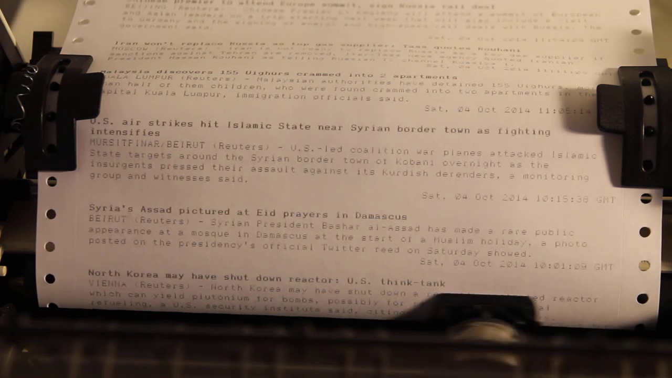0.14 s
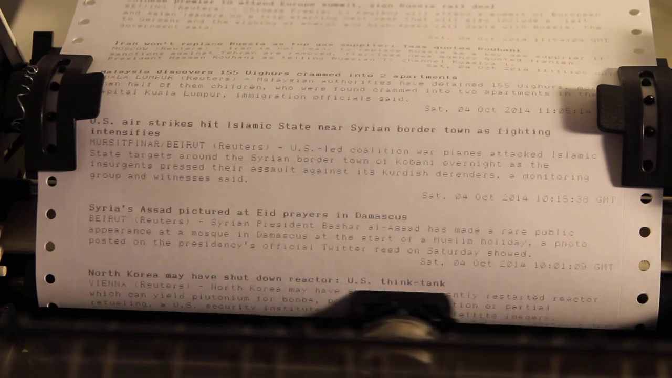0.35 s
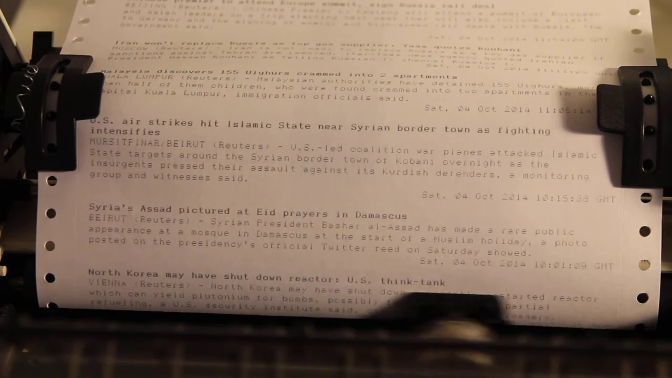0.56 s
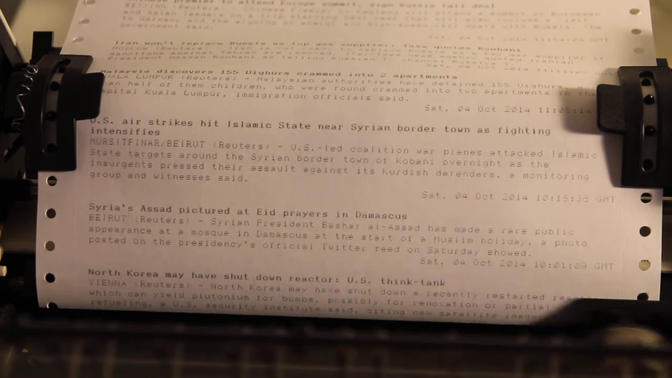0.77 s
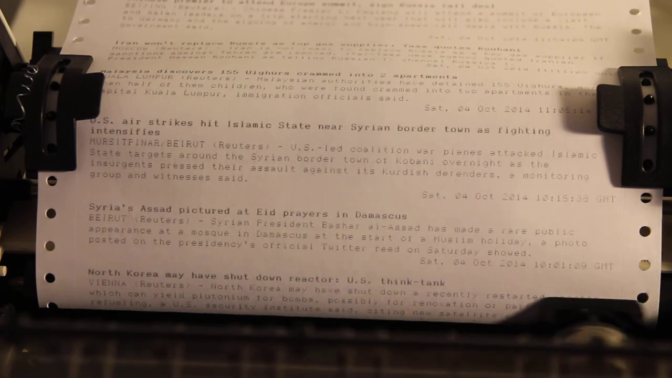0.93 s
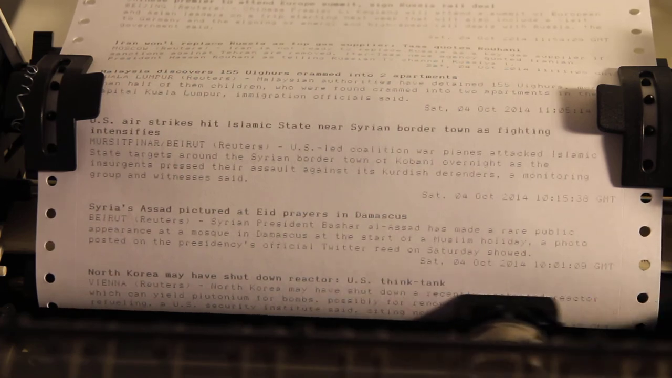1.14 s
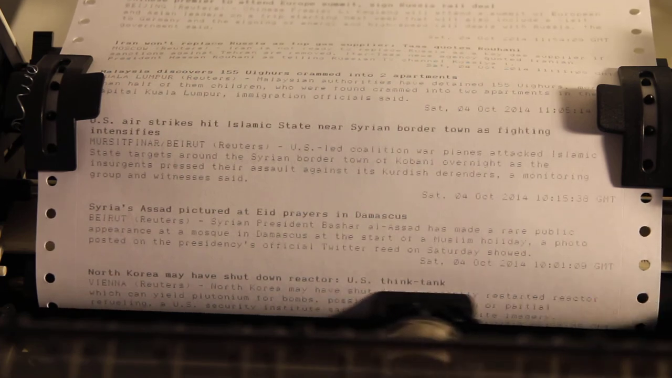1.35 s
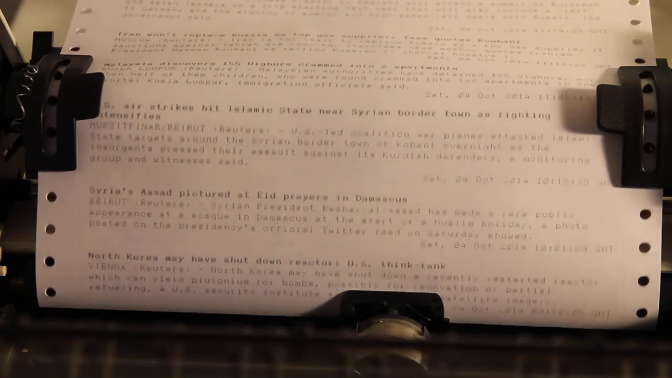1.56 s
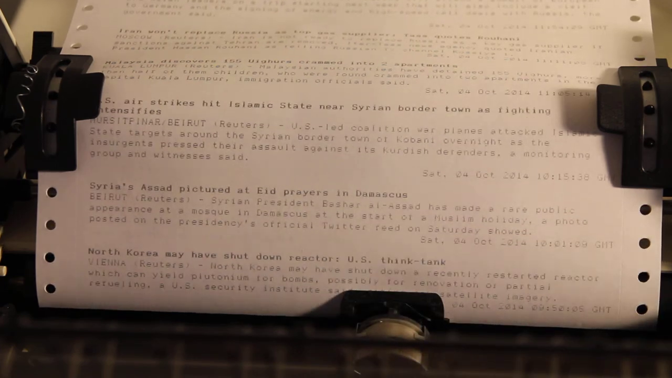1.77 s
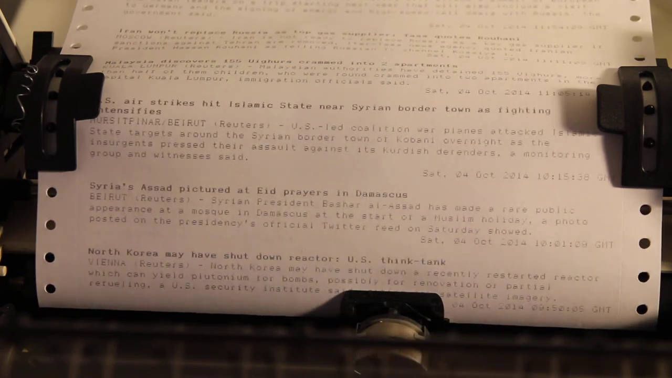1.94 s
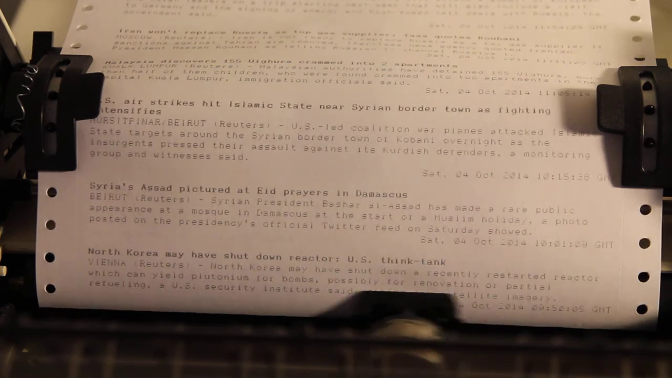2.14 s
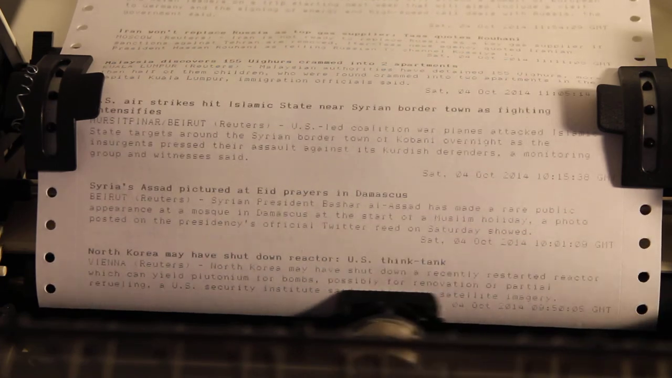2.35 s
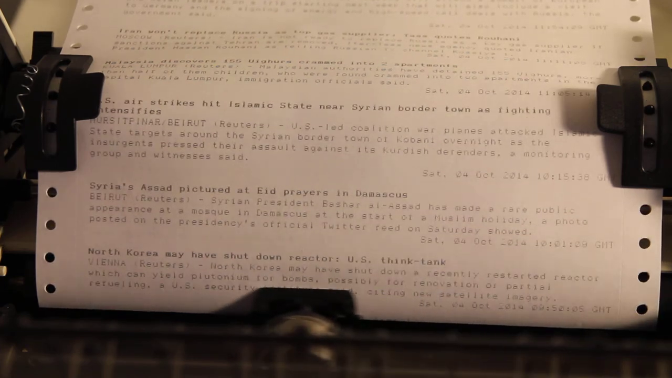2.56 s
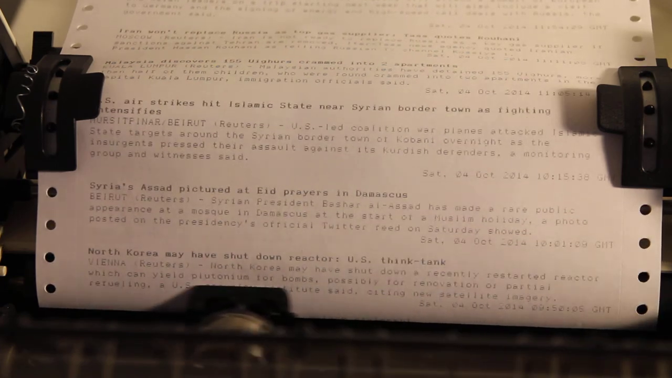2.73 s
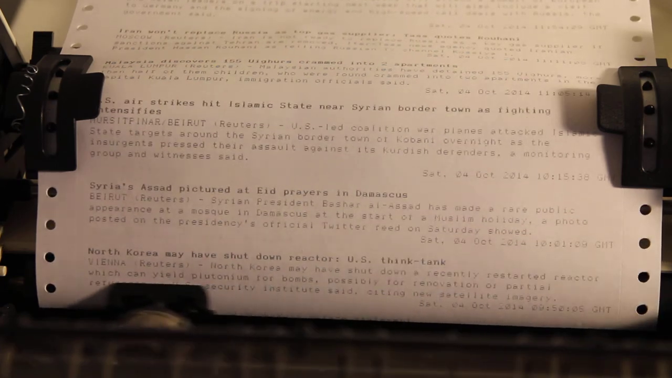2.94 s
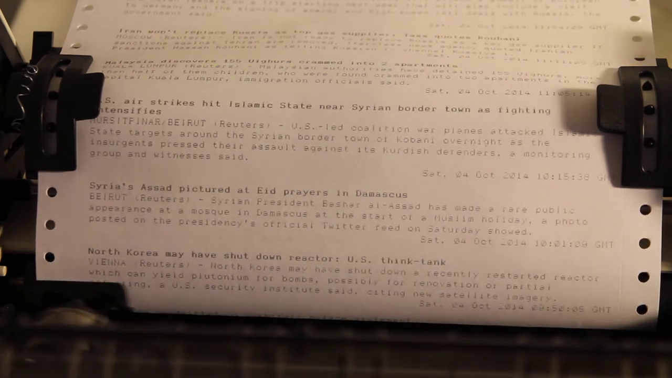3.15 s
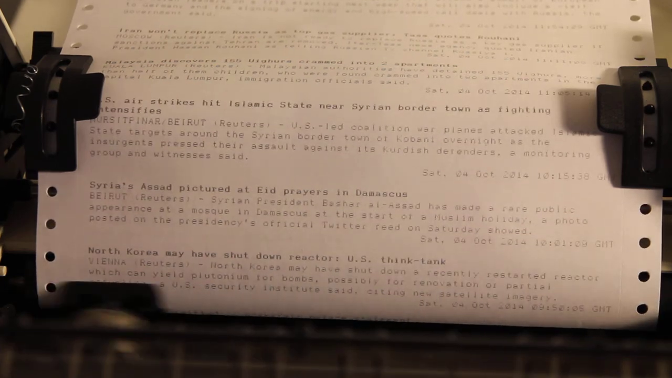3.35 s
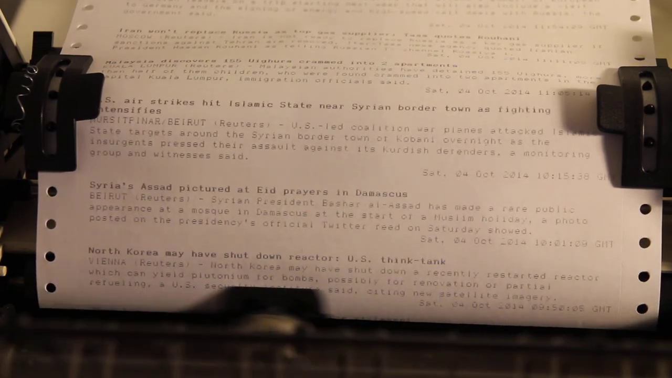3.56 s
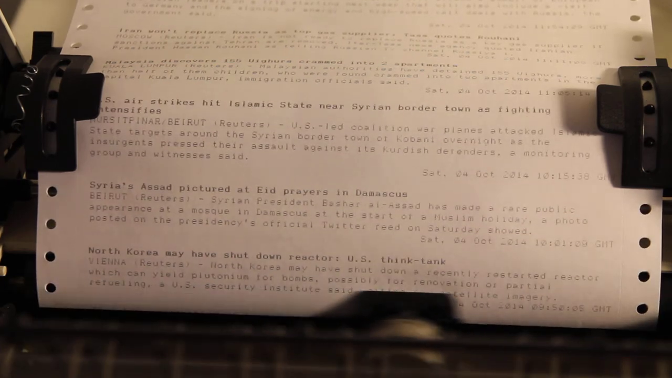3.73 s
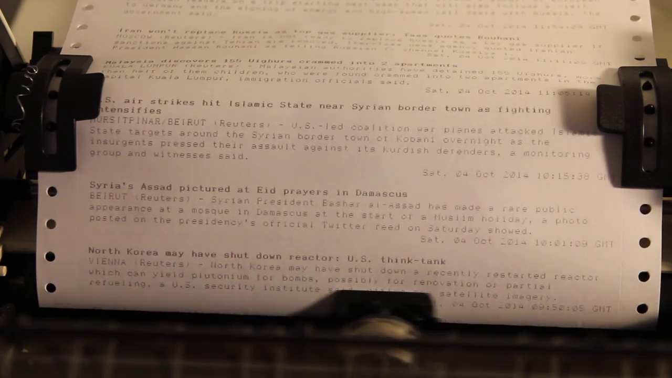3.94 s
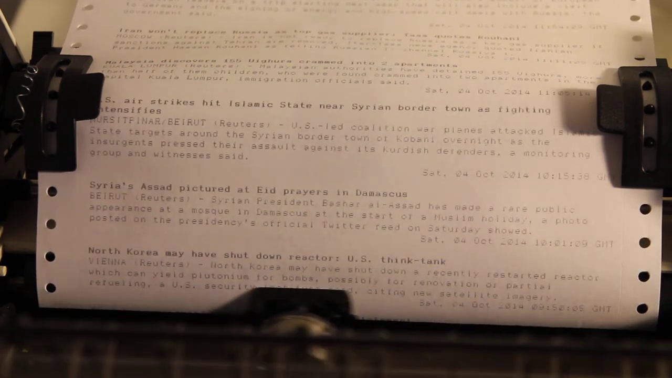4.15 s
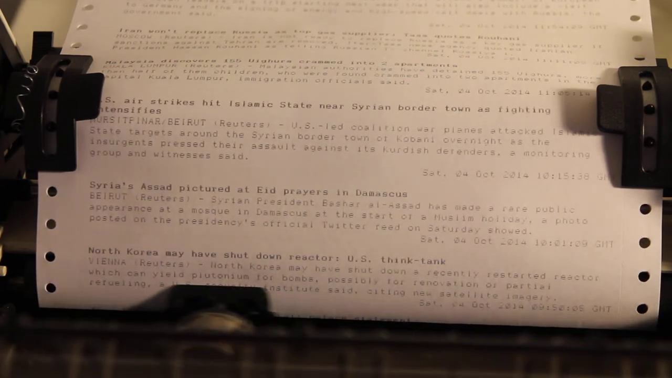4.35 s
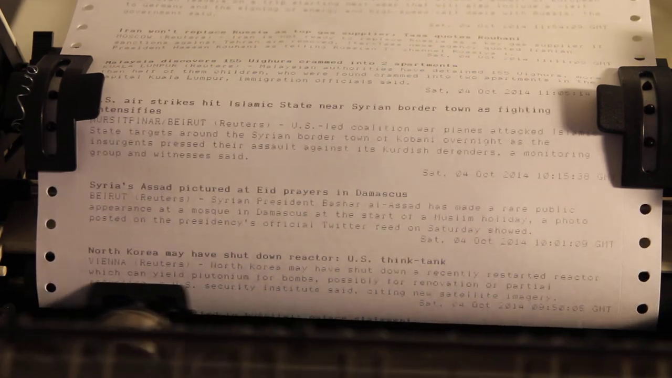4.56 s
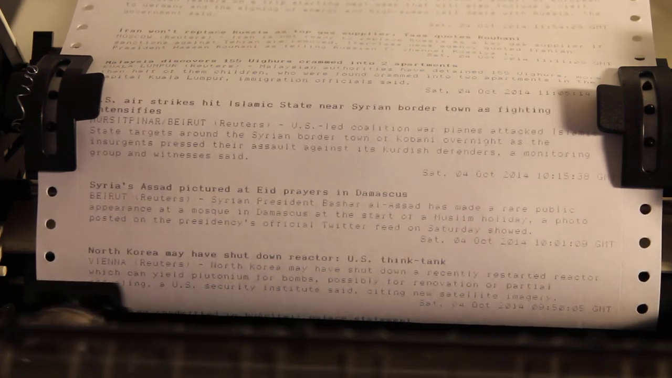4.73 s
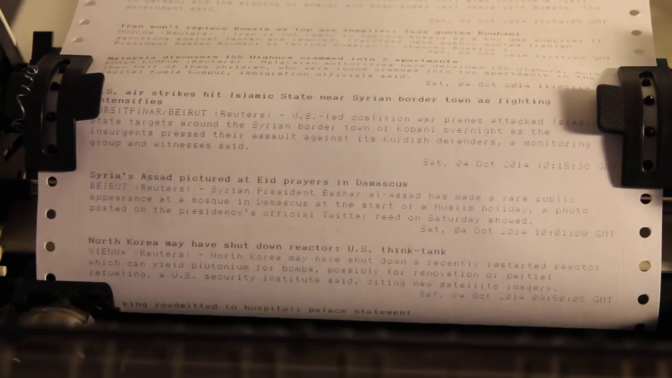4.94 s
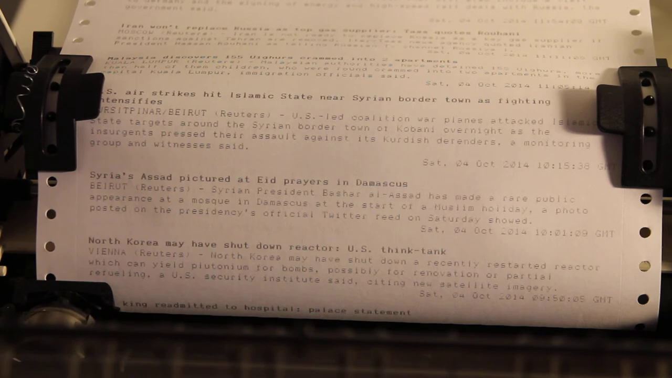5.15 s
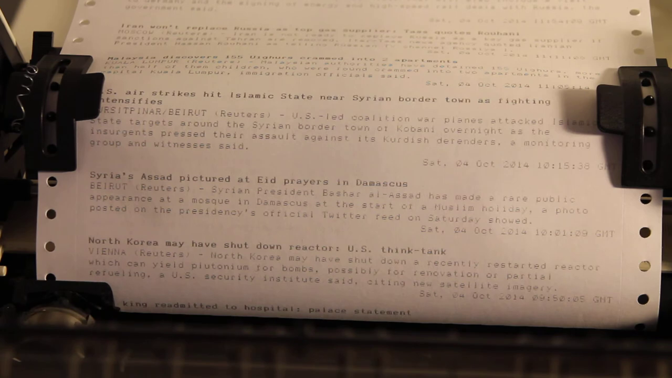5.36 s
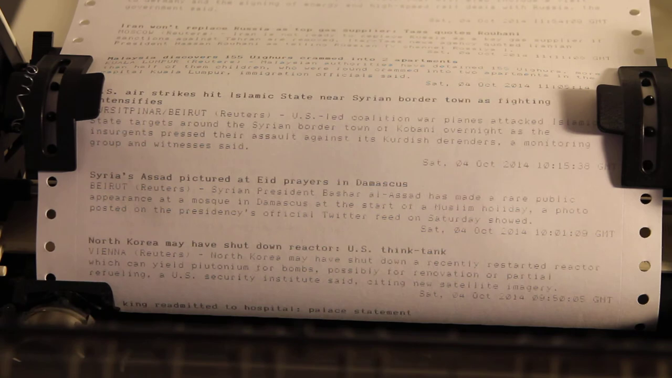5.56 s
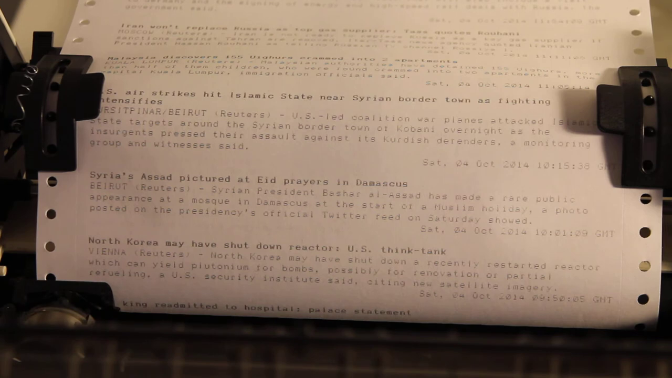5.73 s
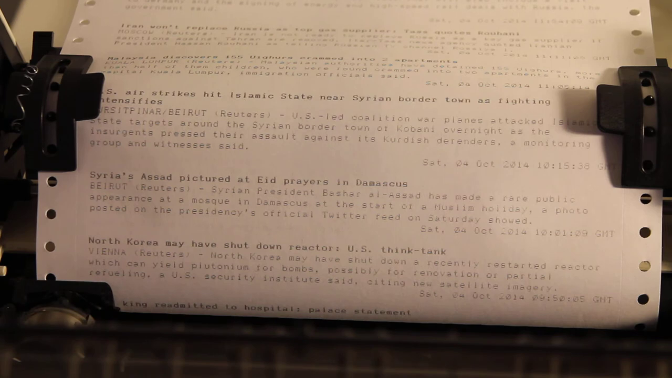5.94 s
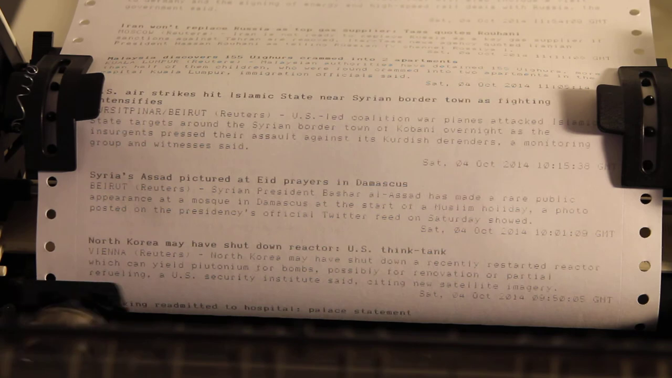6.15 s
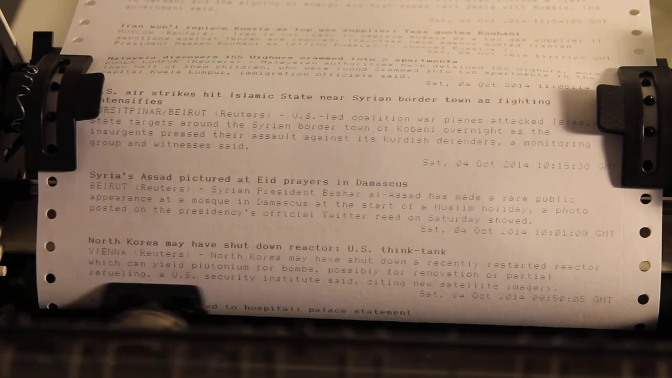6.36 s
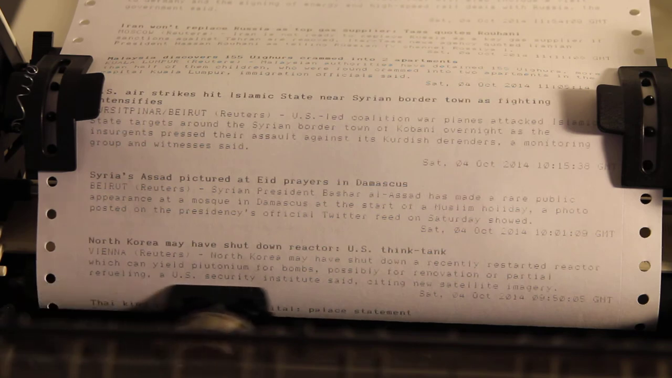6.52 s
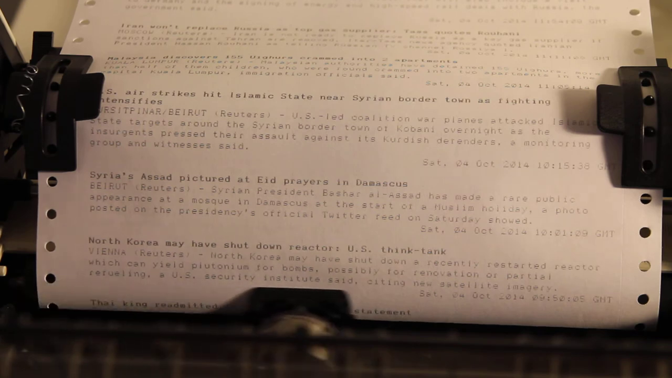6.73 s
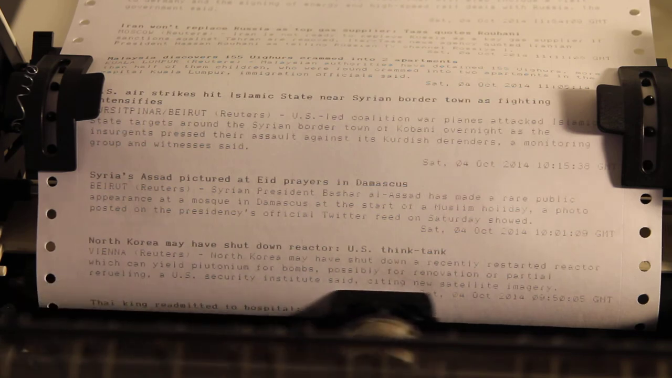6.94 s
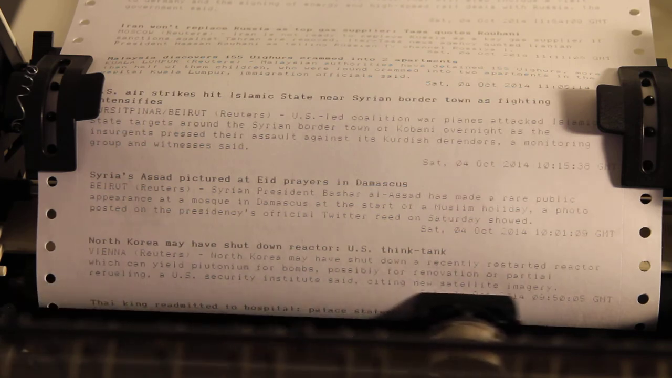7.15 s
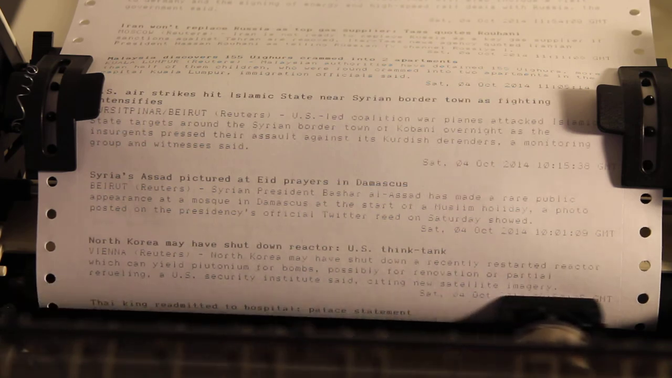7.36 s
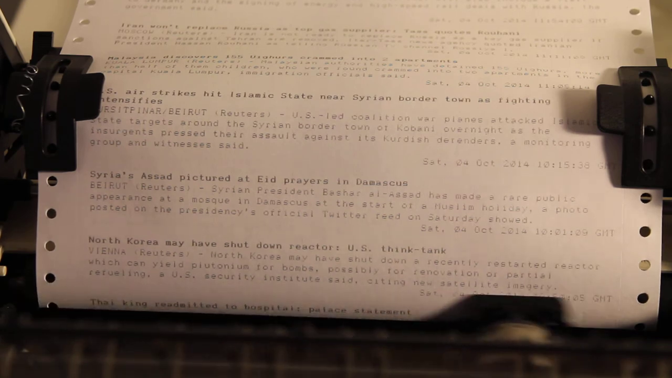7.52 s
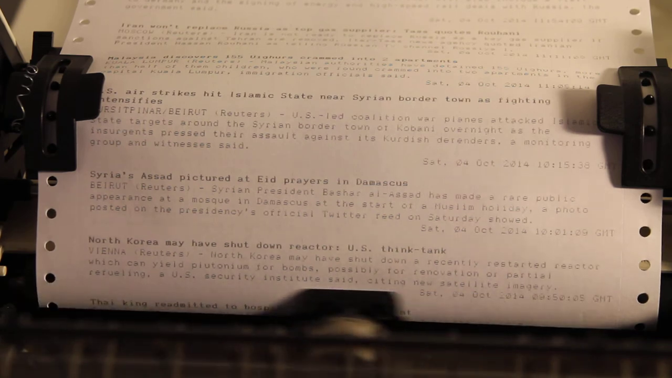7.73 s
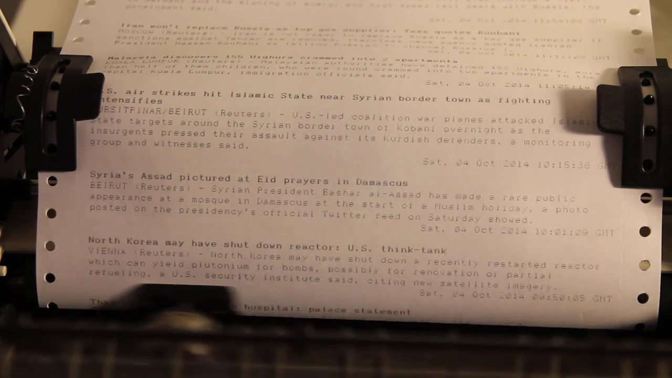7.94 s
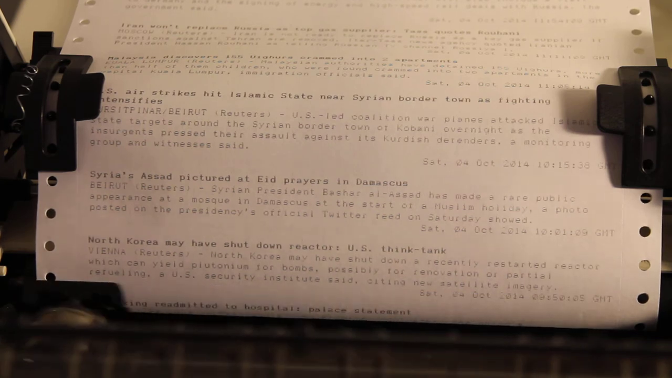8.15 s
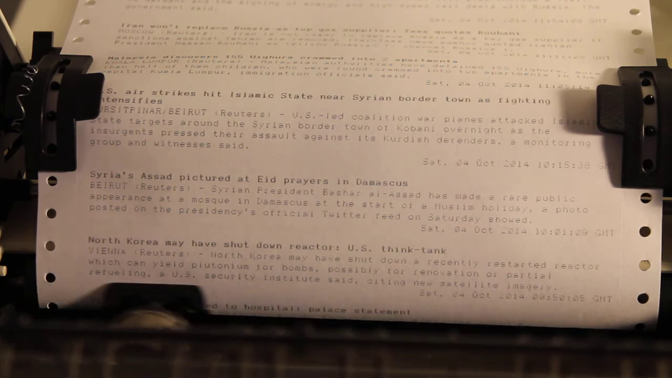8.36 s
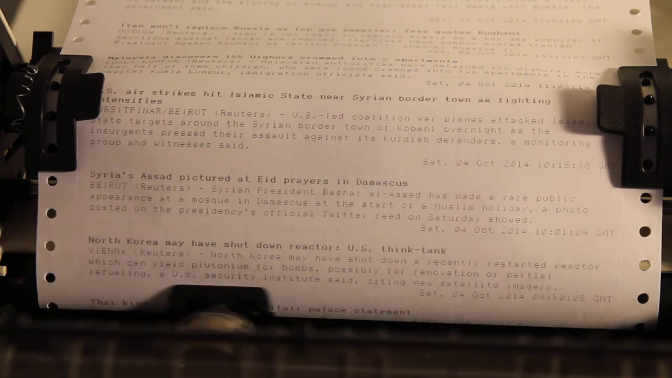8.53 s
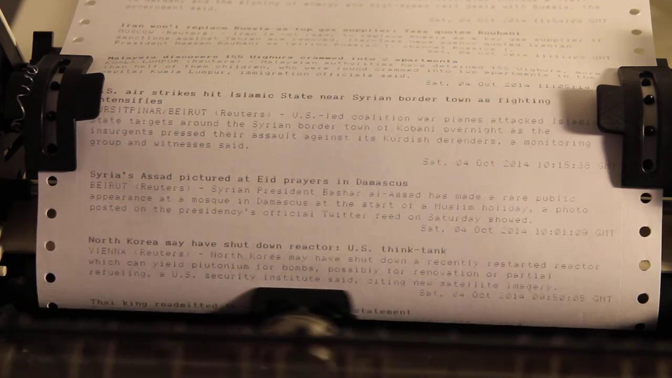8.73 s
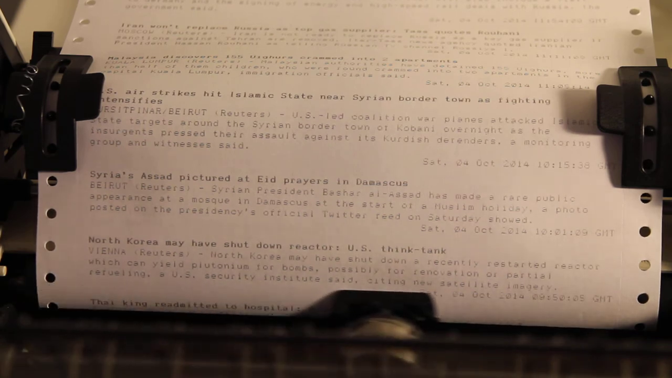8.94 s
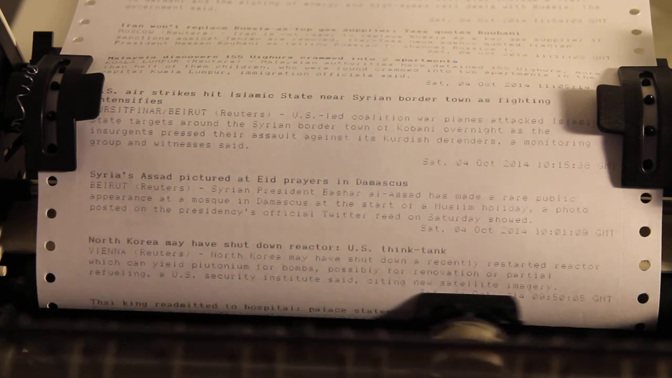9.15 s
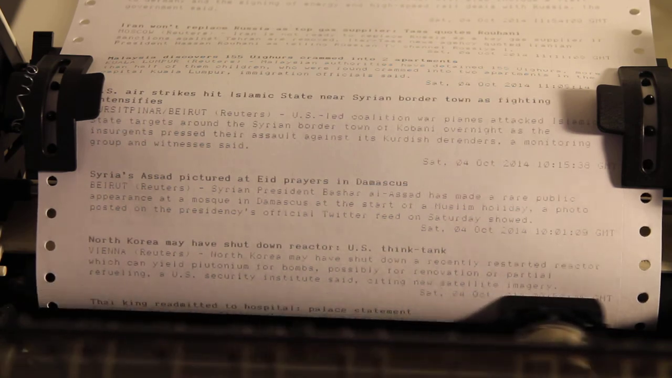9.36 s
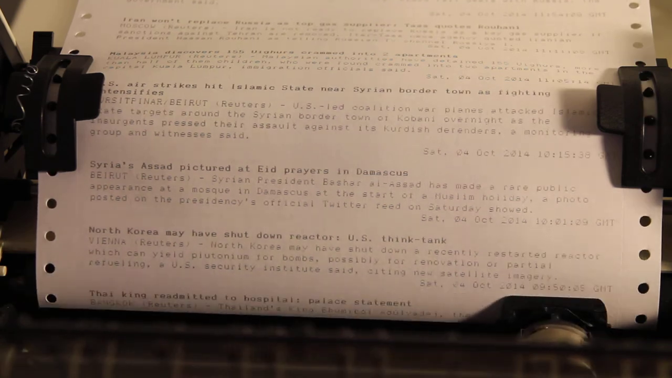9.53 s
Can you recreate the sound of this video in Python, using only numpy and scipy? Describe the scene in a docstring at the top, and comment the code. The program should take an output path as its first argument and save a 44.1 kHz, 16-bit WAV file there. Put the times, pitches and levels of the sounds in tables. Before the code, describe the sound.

A dot matrix printer prints in harsh, whining buzzes, with carriage knocks, whirring returns and brief paper feeds between them.

```python
"""The needles of a dot matrix printer rasp and whine, close up in a small room, as they hammer out words.
They fire on a steady beat, one column of dots at a time, against the platen (the roller behind the paper).
Three lines are printed, each in two passes. After the first pass the carriage that carries the print head
turns with a knock, whirrs back along its rail and brakes; after the second the paper is pulled up.
The transformer hums throughout."""
import sys
import numpy as np
from scipy import signal
from scipy.fft import rfft, irfft
from scipy.io import wavfile
from scipy.ndimage import map_coordinates

SR = 44100
rng = np.random.default_rng(int(sys.argv[2]) if len(sys.argv) > 2 else 0)


def put_to_file(sound):
    """Save the sound as 16-bit audio at rate SR, in the file named by the first command-line argument."""
    columns = np.atleast_2d(sound).T  # one column per channel
    safe = np.clip(columns, -1, 1)
    whole_steps = np.round(safe * 32767)
    wavfile.write(sys.argv[1], SR, whole_steps.astype(np.int16))


N = 422919
TIME = np.arange(N) / SR
FREQS = np.fft.rfftfreq(4096, 1 / SR)
TOP_HZ = 15850  # the sound fades out above this pitch
COLUMN_HZ, COLUMNS_PER_LETTER, NEEDLES = 1451.8, 24, 9

# Passes of the head, two to a line. Letters are made of flat strokes (bars) and upright ones (stems):
# start/s, level/dB, share of bars (0-1), whine/dB, treble/dB, weight of bar ringing, weight of stem ringing
PRINT_PASSES = [(-0.11, -33.5, 0.91, -13.5, 1, 1.1, 0.05), (0.945, -33, 1, -13, -0.5, 0.71, 0.05),
                (2.352, -31, 0.76, -8, 0.5, 1.2, 0.05), (3.927, -32, 0.39, -14, -0.4, 0.05, 1.05),
                (6.249, -31, 0.79, -12, -2, 0.74, 0.05), (8.247, -33.5, 0.32, -12.5, -2, 0.044, 0.3)]
# Lines of text: starting place/letters from the left, direction (+1 is rightward), letters in each word
TEXT_LINES = [(73, -1, (3, 8, 4, 3, 2, 4)), (50, -1, (9, 6, 9, 2, 10, 4, 4)),
              (0, 1, (7, 9, 1, 10, 4, 8, 10, 3, 7))]


def print_head(letter_hz=35, fade_db_per_s=1.08):
    """The needles rasp and whine; the tone shifts with place, word and letter, and each pass fades a bit."""
    # The platen booms most near its middle and is brightest on the left: place/letters, boom/dB, treble/dB
    platen = [(0, -1.5, 3), (14.02, -7, 0.5), (30, 1.5, 0.3), (46, 4, 1.5), (62, -2, 0.8)]
    # Resonances that swell and fade from letter to letter: f/Hz, width/Hz, swing/dB
    letter_swings = [(1500, 350, 3.5), (2210, 250, 3.5), (2950, 400, 2.5), (3700, 400, 2.5)]
    dots, ring_db = page()
    out = rasp(dots) + whine(dots)
    place = head_place()
    places, booms, trebles = np.transpose(platen)
    boom_db = np.interp(place, places, booms)
    word_db = np.interp(TIME * COLUMN_HZ, np.arange(len(ring_db)), ring_db)
    treble_db = np.interp(place, places, trebles) + pass_setting("treble")
    for band_hz, db in (((1300, 1800), boom_db), ((2700, 3300), word_db), ((8000, 18000), treble_db)):
        out = lift(out, band_hz, db)
    for hz, width, swing_db in letter_swings:
        out = lift(out, (hz - width / 2, hz + width / 2), swing_db * np.clip(wander(letter_hz), -2, 2))
    return out * amp(-fade_db_per_s * (TIME - pass_setting("start")))


def rasp(dots, level_db=-0.71, ring_width_hz=170):
    """Needle strikes set the head, platen and case ringing."""
    # Tone colour of one strike: f/Hz, level/dB
    strike_spectrum = [(80, -40.5), (200, -19.5), (350, -29), (600, -13.5), (1000, -8.5), (1300, -11.5),
                       (1950, -7), (2400, -7), (3300, -0.5), (5000, 0.85), (7000, -0.5), (9200, -3.5),
                       (10700, 0.4), (12600, -3), (15300, -2)]
    # Resonances of platen and case: f/Hz, width/Hz, boost/dB
    body_rings = [(709, 110, 4), (1442, 140, 3), (1590, 150, 8), (2056, 160, -2.5), (2220, 120, 3.5),
                  (2540, 150, 5), (2830, 140, -2.5), (2942, 170, 2.5)]
    # Resonances brought out by the needles that draw bars: f/Hz, boost/dB at weight 1
    bar_rings = [(712, 3.5), (2195, 5.5), (2945, 1.5), (3710, 5.5), (5015, 1), (6400, 1.5), (7200, 1),
                 (8100, 1), (11100, 3.5)]
    # The same for stems: f/Hz, boost/dB at weight 1
    stem_rings = [(1600, 4.3), (2520, 5.2), (3110, 6.5), (3990, 4), (4620, 5), (5540, 2.9), (6250, 3)]
    hits, out = strikes(dots), np.zeros(N)
    body_db = look_up(strike_spectrum, FREQS) + sum(bump(*ring) for ring in body_rings)
    bar_db = sum(bump(hz, ring_width_hz, db) for hz, db in bar_rings)
    stem_db = sum(bump(hz, ring_width_hz, db) for hz, db in stem_rings)
    for start, *_, bar_weight, stem_weight in PRINT_PASSES:
        ringing = colour(hits, body_db + bar_weight * bar_db + stem_weight * stem_db)
        out = np.where(TIME >= start, ringing, out)
    return amp(level_db) * out


def strikes(dots, ring_s=0.0023, tick=3.2, uneven_db=2, flight_spread_s=0.00012):
    """Each needle snaps on the platen and rings briefly in its own way; flight times vary a little."""
    t, out = np.arange(400) / SR, np.zeros(N)
    for row in dots:
        ring = rng.standard_normal(len(t)) * np.exp(-t / ring_s)
        ring[0] += tick * rng.choice([-1, 1])
        spectrum = rfft(ring)
        ring = irfft(spectrum / np.sqrt(abs(spectrum))) * np.exp(-t / (4 * ring_s))  # tames the peaks
        when = (np.arange(len(row)) + rng.random()) / COLUMN_HZ
        when += flight_spread_s * rng.standard_normal(len(row))
        samples = np.clip(np.round(when * SR).astype(int), 0, N - 1)
        clicks = np.zeros(N)
        clicks[samples] = row * unit(amp(uneven_db * rng.standard_normal(len(row))))
        add(out, 0, signal.oaconvolve(clicks, ring / np.linalg.norm(ring)))
    return out * np.sqrt(SR / COLUMN_HZ)


def whine(dots, waver_db=1.5):
    """Needles firing column after column add up to a tone whose harmonics swell and fade."""
    # Harmonics of the needle tone: multiple of the column rate, level/dB
    harmonics = [(1, -5), (2, 7), (3, -1), (4, -9), (5, -8.5), (6, -2), (7, -8), (8, -9.5), (9, -1),
                 (10, -9)]
    drive = np.interp(TIME, np.arange(dots.shape[1]) / COLUMN_HZ, np.linalg.norm(dots, axis=0))
    drive = signal.lfilter(*signal.butter(1, 90, fs=SR), drive)
    pitched = sum(amp(db + waver_db * wander(22)) * sine(k * COLUMN_HZ * TIME) for k, db in harmonics)
    return drive * amp(pass_setting("whine")) * unit(pitched)


def page():
    """How hard each needle strikes in each column, and how much the head rings there (dB)."""
    # How much each word's shapes ring the head, one row a line: boost/dB for each word
    word_rings = [(-7.5, -3.5, 3.5, 1.5, 5, 1), (2, 0, 0, -4.5, 1, -3, -9.5),
                  (-4, -3, -2, 1.5, 2.5, -1, 3, 2, -1.5)]
    dots = np.zeros((NEEDLES, int(N / SR * COLUMN_HZ)))
    ring_db = np.zeros(dots.shape[1])
    for k, (start, db, bar_share, *_) in enumerate(PRINT_PASSES):
        column = round(start * COLUMN_HZ)
        for letters, word_db in zip(TEXT_LINES[k // 2][2], word_rings[k // 2]):
            word = unit(np.hstack([letter(bar_share, n == 0) for n in range(letters)]))
            at = column + np.arange(word.shape[1])
            if letters > 1 or k % 2 == 0:  # a lone dash needs only the first pass
                dots[:, at[at >= 0]] = amp(db) * word[:, at >= 0] / np.sqrt(NEEDLES)
                ring_db[max(column, 0):] = word_db
            column += (letters + 1) * COLUMNS_PER_LETTER
    return dots, ring_db


def letter(bar_share, opens_word, stem_strength=1.9):
    """Dots of one made-up letter: a bar repeats one needle, a stem fires them all nearly at once."""
    dots = np.zeros((NEEDLES, COLUMNS_PER_LETTER))
    for needle in rng.choice(NEEDLES, size=5, replace=False):
        first, last = rng.integers(0, 5), 21 - rng.integers(0, 9)
        dots[needle, first:last] = np.sqrt(bar_share)
    for column, chance in ((0, .8), (6, .35), (12, .75)):
        if rng.random() < chance:
            lag = rng.integers(0, 3, NEEDLES) + rng.integers(0, 2)
            dots[np.arange(NEEDLES), column + lag] += stem_strength * np.sqrt(1 - bar_share)
    if opens_word:  # rested needles hit hard together
        dots[:, 0] = np.maximum(dots[:, 0], 1.15)
    return unit(dots)


def carriage(slide_db=-59, return_db=-58, step_hz=257, belt_hz=12):
    """The carriage slides on its rail; in the fast return between passes its motor sings unevenly."""
    # Noise of sliding on the rail: f/Hz, level/dB
    slide_spectrum = [(41, -41), (70, -7), (123, -1.5), (148, 1.5), (254, -3.5), (364, -2), (523, 4.5),
                      (822, -5.5), (1130, 3), (2170, -6.5), (3730, -3), (4370, -7), (8610, -2.5),
                      (15500, -9.5)]
    # Stepper motor tone going right: multiple of the step rate, level/dB
    right_harmonics = [(1, 5), (2, 0), (3, -5), (4, -5), (5, -2.5), (7, -8.5), (10, -9)]
    # The same going left: multiple of the step rate, level/dB
    left_harmonics = [(1, -7), (2, -13), (3, 0), (5, -9), (7, -4), (11, -18), (14, -2), (15, -9), (16, -11),
                      (19, -15)]
    # Scrape of the leftward return: f/Hz, level/dB
    scrape_spectrum = [(100, -27), (3200, -24), (3650, -18), (3900, -13), (4400, -21), (15000, -42)]
    run_up_s, run_out_s, return_after_s, ramp_s = 0.066, 0.11, 0.168, 0.013
    slide = noise(slide_spectrum) * amp(1.5 * wander(220) + 1.3 * np.sin(2 * np.pi * belt_hz * TIME))
    motor_hz = step_hz * (1 + .008 * wander(60))
    right = amp(-69) * unit(tone(right_harmonics, motor_hz) * amp(0.9 * wander(18)))
    left = amp(-67) * unit(tone(left_harmonics, motor_hz) * amp(0.9 * wander(18)))
    left += amp(-63.5) * noise(scrape_spectrum)
    passes = timetable()
    printing = sum(gate(start - run_up_s, end + run_out_s, ramp_s) for start, end, *_ in passes)
    out = amp(slide_db) * slide * printing
    for first, second, (_, direction, _) in zip(passes[::2], passes[1::2], TEXT_LINES):
        returning = gate(first[1] + return_after_s, second[0] - run_up_s, ramp_s)
        out += returning * (amp(return_db) * slide + (left if direction > 0 else right))
    return out


def rattles(grain_db=3, rise_s=0.0008):
    """Loose parts of the carriage chatter at each jerk of the belt."""
    t, level = np.arange(SR // 4) / SR, np.zeros(N)
    for start, db, decay_s, _ in belt_jerks():
        add(level, start, amp(db) * (1 - np.exp(-t / rise_s)) * np.exp(-t / decay_s))
    chatter = noise([(100, -13), (400, 4), (1000, 6), (2000, 3), (4000, 4), (8000, 0.5), (15000, -2.5)])
    return level * unit(chatter * amp(grain_db * wander(1200)))


def knocks(push_cycles=5.3, wobble_rad=0.9):
    """Each uneven shove of the belt rings the frame's low notes; the deepest swell most slowly."""
    # Notes of the frame: f/Hz, level/dB, time to fade by 60 dB/s
    frame_notes = [(81, -5.5, 0.12), (101.4, 7, 0.3), (120, -15.5, 0.06), (192.6, -0.5, 0.27),
                   (237.7, -8.5, 0.2), (288, -1, 0.16), (406, -1.5, 0.18), (588, 0.5, 0.099)]
    t, out = np.arange(SR // 2) / SR, np.zeros(N)
    for hz, note_db, fade_s in frame_notes:
        level = np.zeros(N)
        swell = 1 - np.exp(-t * hz / push_cycles)
        for start, _, _, db in belt_jerks():
            add(level, start, amp(db + note_db - 60 * t / fade_s) * swell)
        out += level * np.sin(2 * np.pi * hz * TIME + wobble_rad * wander(hz / 5))
    return out


def belt_jerks():
    """The belt jerks whenever the carriage wakes, turns, brakes or halts."""
    # Waking from rest: t/s, rattle/dB, rattle decay/s, knock/dB
    wakes = [(2.178, -47.5, 0.033, -52), (2.256, -39, 0.014, -51), (6.179, -61, 0.019, -60),
             (6.214, -60, 0.015, -77)]
    # Turning: same columns, t/s from the end of a line's first pass
    turn = [(0.055, -48.5, 0.025, -46), (0.171, -46, 0.014, -65), (0.187, -43.5, 0.015, -61.5)]
    # Braking: same columns, t/s from the start of its second pass
    brake = [(-0.097, -48, 0.024, -51)]
    # Halting: same columns, t/s from the end of its second pass
    halt = [(0.06, -57, 0.031, -55.5)]
    jerks, passes = list(wakes), timetable()
    for first, second in zip(passes[::2], passes[1::2]):
        for moment, kind in ((first[1], turn), (second[0], brake), (second[1], halt)):
            jerks += [(moment + delay, *rest) for delay, *rest in kind]
    return jerks


def paper_feed(motor_hz=195.6, grain_db=1.5, judder_db=1.5):
    """The feed motor drones and judders while toothed belts drag the rustling paper up."""
    # Paper feeds: start/s, end/s, motor/dB, rustle/dB
    feeds = [(1.482, 1.672, -60, -61.5), (4.796, 4.925, -62, -64.5), (9.414, 9.541, -59.5, -64.5)]
    # Feed motor tone: multiple of its pitch, level/dB
    harmonics = [(1, 1), (2, -14), (3, -24.5), (4, -22), (6, -29)]
    # Rustle of the paper: f/Hz, level/dB
    rustle_spectrum = [(100, -5), (350, -7), (600, 3), (850, -7), (1450, -2), (2500, -3.5), (4000, -4.5),
                       (7000, -9.5), (11000, -13), (15500, -21)]
    motor = tone(harmonics, motor_hz * (1 + 0.01 * wander(30)))
    motor = unit(motor * amp(judder_db * wander(70)))
    paper = noise(rustle_spectrum) * amp(grain_db * wander(400))
    return sum(gate(start, end, 0.026) * (amp(motor_db) * motor + amp(paper_db) * paper)
               for start, end, motor_db, paper_db in feeds)


def wall_echo(x, strength=0.087, near_s=0.000491, far_s=0.001316):
    """Adds the echo from the case wall, which comes later as the head moves right."""
    place = head_place()
    delay = near_s + (far_s - near_s) * place / place.max()
    return x + strength * map_coordinates(x, [(TIME - delay) * SR], order=3)


def room(x, case_db=-9, case_s=0.0037, room_db=-8):
    """Adds quick echoes inside the case, which is too small to hold bass, then the room's fading tail."""
    # How long the room rings: f/Hz, time to fade by 60 dB/s
    fade_times = [(200, 0.5), (600, 0.56), (1300, 0.41), (3500, 0.29), (9000, 0.27), (15000, 0.28)]
    t = np.arange(SR * 3 // 4) / SR
    case_taps, room_taps = rng.choice([-1., 1.], (2, len(t))) * (rng.random((2, len(t))) < .1)
    case = case_taps * np.exp(-t / case_s) * (t > .001)
    case = signal.lfilter(*signal.butter(2, 600, "highpass", fs=SR), case)
    hz, times, spectra = signal.stft(room_taps * (t > .006), SR, nperseg=256)
    spectra *= amp(-60 * times / look_up(fade_times, hz)[:, None])
    tail = signal.istft(spectra, SR, nperseg=256)[1][:len(t)]
    echoes = amp(case_db) * case / np.linalg.norm(case) + amp(room_db) * tail / np.linalg.norm(tail)
    return x + signal.fftconvolve(x, echoes)[:N]


def hum_and_air(air_db=-79.5):
    """The transformer hums over the still air of the room."""
    # Tones of the transformer: f/Hz, level/dB
    hum_tones = [(120, -81), (240, -83.5), (360, -84.5), (480, -97), (720, -93.5)]
    # Hush of the air: f/Hz, level/dB
    air_spectrum = [(30, -7), (60, -6), (95, -1.5), (160, -5), (210, -2), (330, -5.5), (500, -10),
                    (1000, -10), (2000, -16), (5000, -21.5), (10000, -23.5), (15500, -23)]
    hum = sum(amp(db) * np.sqrt(2) * sine(hz * TIME) for hz, db in hum_tones)
    return hum + amp(air_db) * noise(air_spectrum)


def timetable():
    """One row a pass: start/s, end/s, and the head's place/letters at both."""
    rows = []
    for k, (start, *_) in enumerate(PRINT_PASSES):
        place, direction, words = TEXT_LINES[k // 2]
        letters = sum(words) + len(words) - 1  # spaces count too
        end = start + letters * COLUMNS_PER_LETTER / COLUMN_HZ
        rows.append((start, end, place, place + direction * letters))
    return np.array(rows)


def head_place():
    """Place of the head over time, in letters from the left."""
    times, places = np.hsplit(timetable(), 2)
    return np.interp(TIME, times.ravel(), places.ravel())


def pass_setting(name):
    """One setting of the passes over time, held from each start to the next."""
    columns = dict(zip(("start", "level", "bars", "whine", "treble"), np.transpose(PRINT_PASSES)))
    current = np.maximum(np.searchsorted(columns["start"], TIME) - 1, 0)
    return columns[name][current]


def amp(db):
    """Turns decibels into a gain."""
    return 10 ** (np.asarray(db) / 20)


def unit(x):
    """Scales to an average power of one."""
    return x / np.sqrt(np.mean(x ** 2) + 1e-20)


def look_up(points, hz):
    """Reads between a table's rows on a log-frequency axis."""
    f, value = np.transpose(points)
    return np.interp(np.log(hz + 1), np.log(f + 1), value)


def bump(hz, width, db):
    """The dB curve of one resonance over FREQS."""
    return db / (1 + (2 * (FREQS - hz) / width) ** 4)


def add(mix, start, sound):
    """Mixes a sound in at a start time in seconds."""
    part = mix[max(round(start * SR), 0):][:len(sound)]
    part += sound[:len(part)]


def colour(x, db):
    """Shapes the tone by a dB curve over FREQS, with a filter of power one."""
    log_gain = np.log(unit(amp(db - 60 * (FREQS > TOP_HZ + 600))))
    mirrored = np.r_[log_gain, log_gain[-2:0:-1]]
    taps = np.fft.ifft(np.exp(np.conj(signal.hilbert(mirrored)))).real  # rings only after a hit
    return signal.oaconvolve(x, taps)[:len(x)]


def lift(x, band_hz, db):
    """Turns one band up or down by a level that may move over time."""
    band = signal.sosfiltfilt(signal.butter(2, band_hz, "bandpass", fs=SR, output="sos"), x)
    return x + band * (amp(db) - 1)


def noise(spectrum):
    """Steady noise shaped by rows of f/Hz, level/dB."""
    return unit(colour(rng.standard_normal(N), look_up(spectrum, FREQS)))


def wander(hz):
    """A smooth random wobble, no faster than hz."""
    return unit(irfft(rfft(rng.standard_normal(N)) * (np.fft.rfftfreq(N, 1 / SR) < hz), N))


def gate(start, end, ramp_s):
    """One between start and end, with sloping edges."""
    return np.clip(np.minimum(TIME - start, end - TIME) / ramp_s, 0, 1)


def sine(cycles):
    """A sine wave that starts at a random point in its cycle."""
    return np.sin(2 * np.pi * (cycles + rng.random()))


def tone(harmonics, hz):
    """Harmonics of a moving pitch."""
    cycles = np.cumsum(hz) / SR
    return unit(sum(amp(db) * sine(k * cycles) for k, db in harmonics))


def scene():
    """The printer in its room, in mono."""
    printer = wall_echo(print_head()) + carriage() + rattles() + paper_feed()
    return (room(printer) + knocks() + hum_and_air())[None]


def record(dry, offset=-0.0026):
    """Cuts the highest treble and shifts the wave by a small steady offset."""
    lowpass = signal.firwin(511, TOP_HZ, window=("kaiser", 9), fs=SR)
    return offset + signal.oaconvolve(dry, lowpass[None], "same")


dry = scene()
out = record(dry)
put_to_file(out)
```